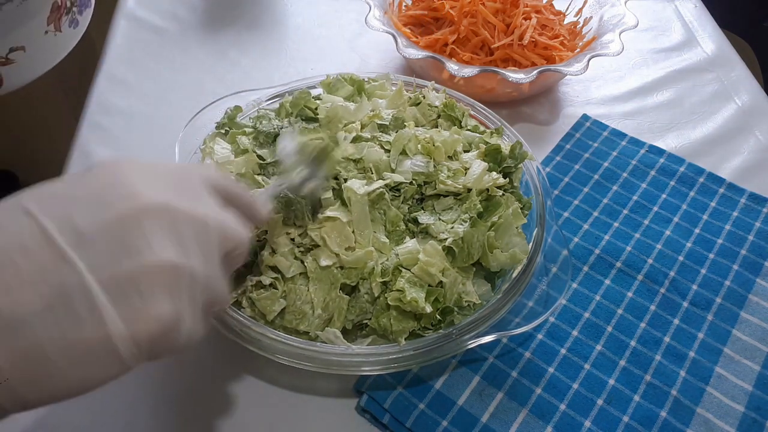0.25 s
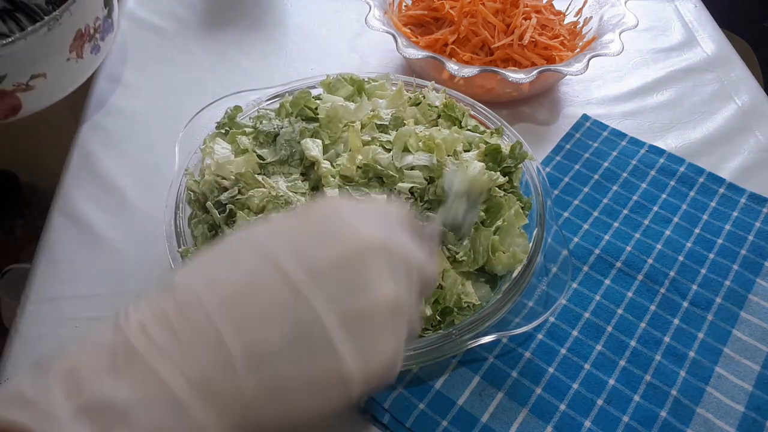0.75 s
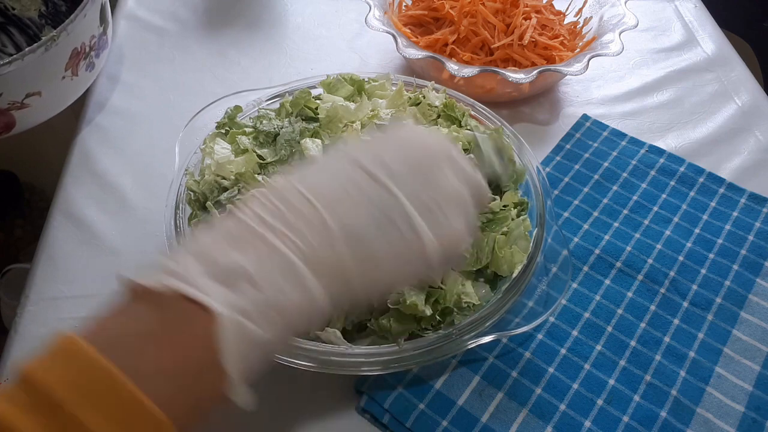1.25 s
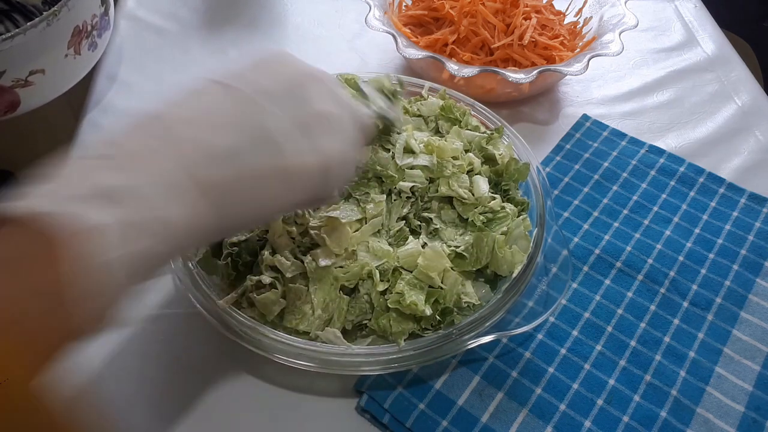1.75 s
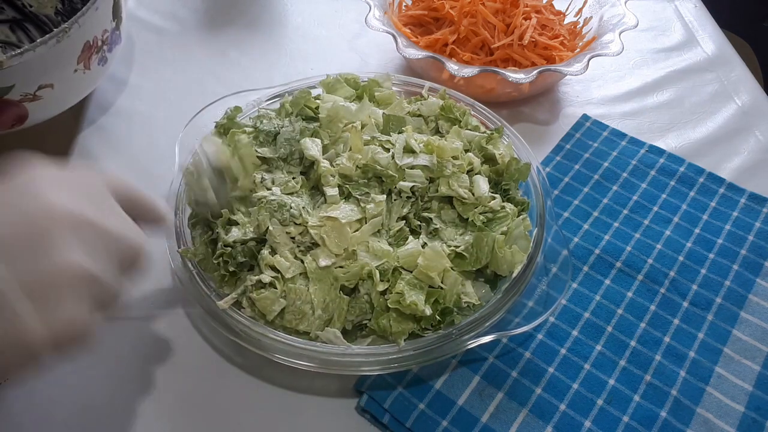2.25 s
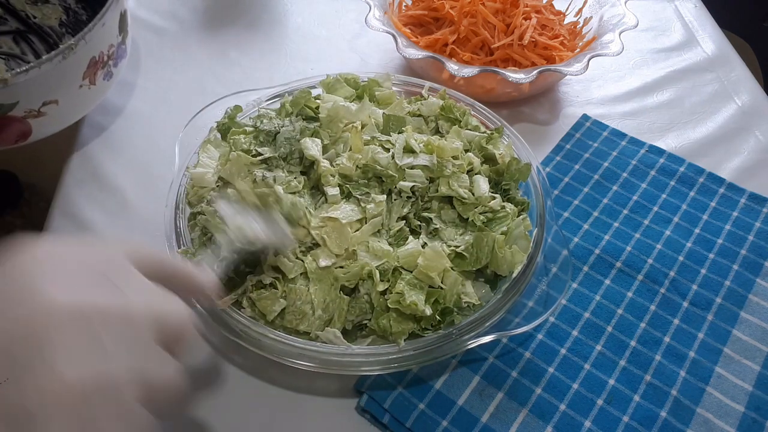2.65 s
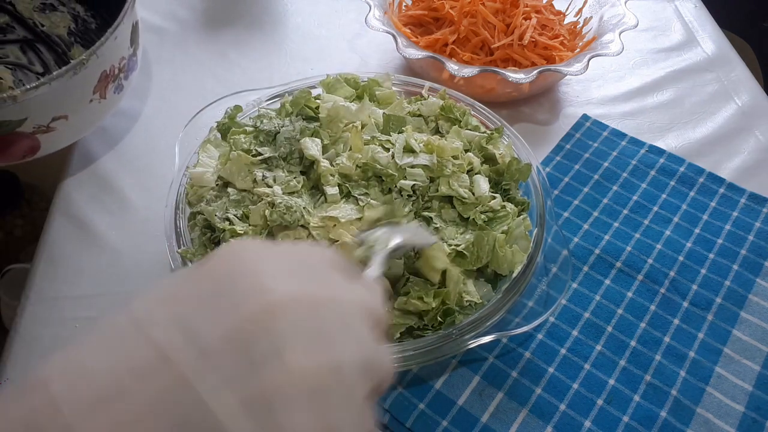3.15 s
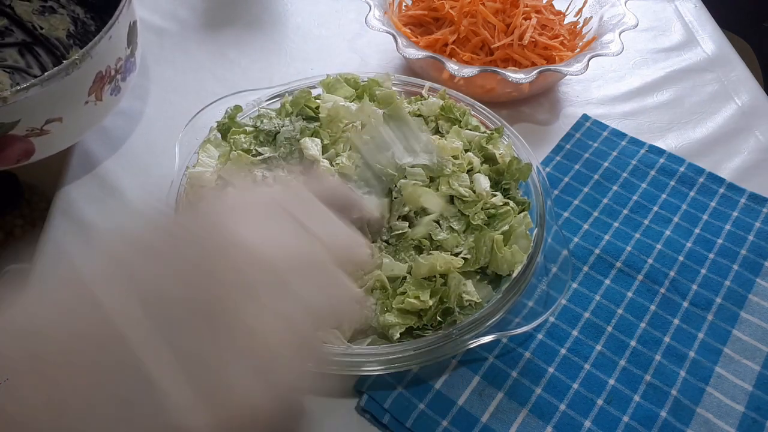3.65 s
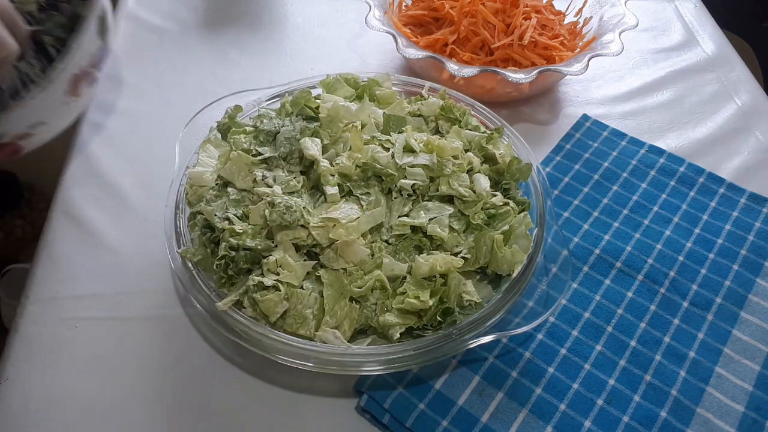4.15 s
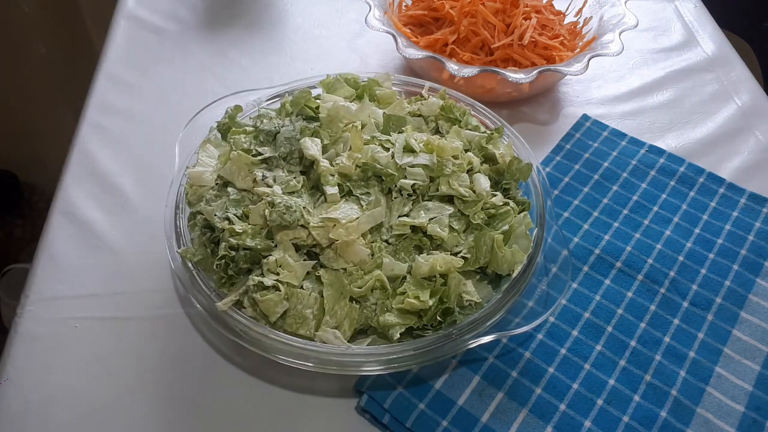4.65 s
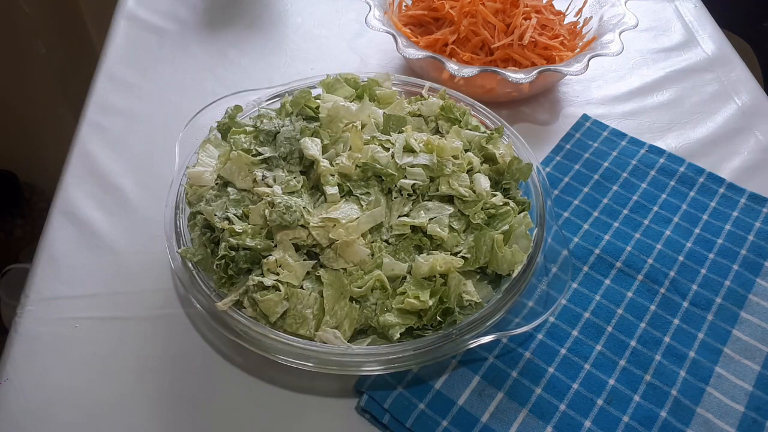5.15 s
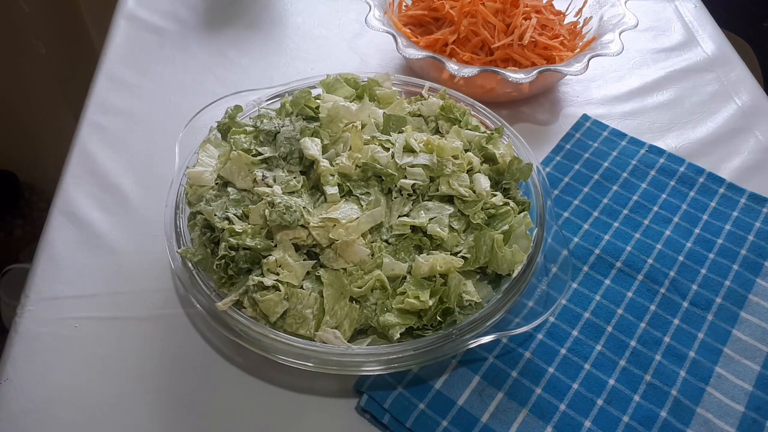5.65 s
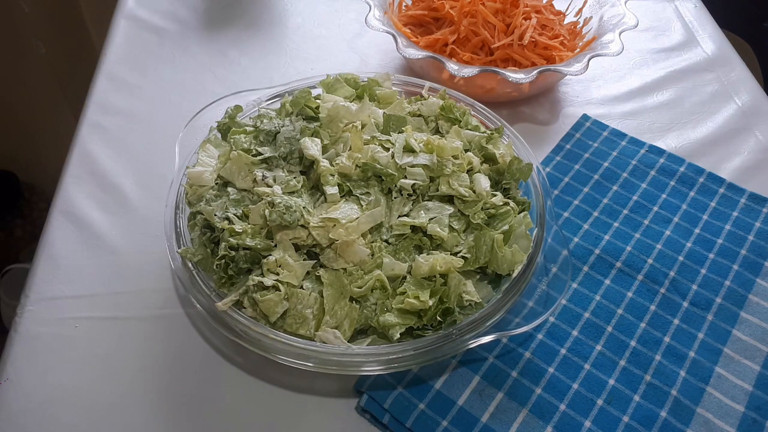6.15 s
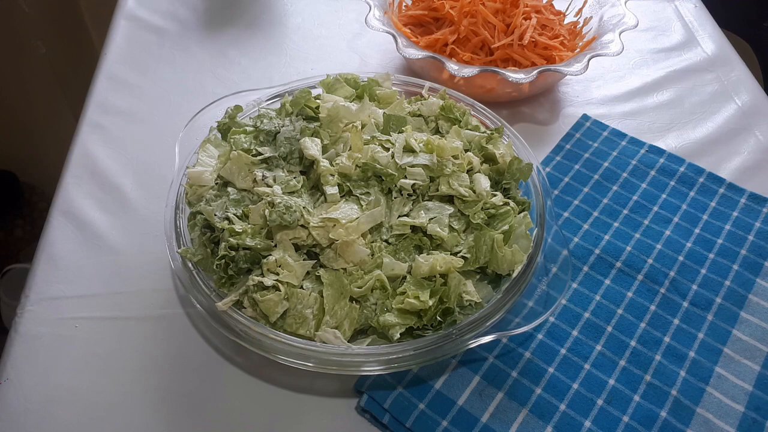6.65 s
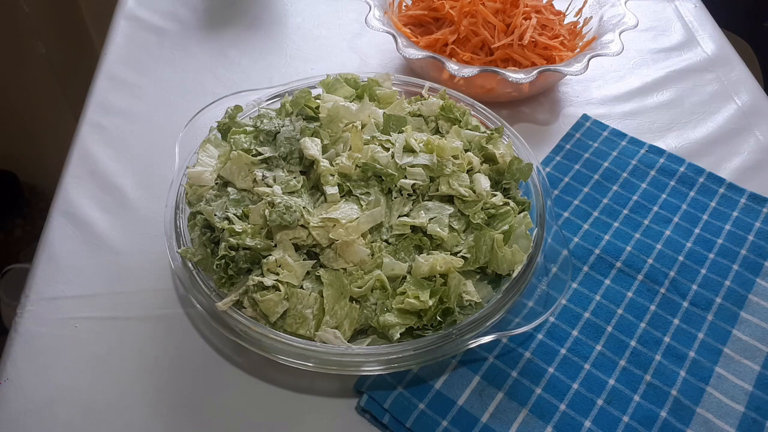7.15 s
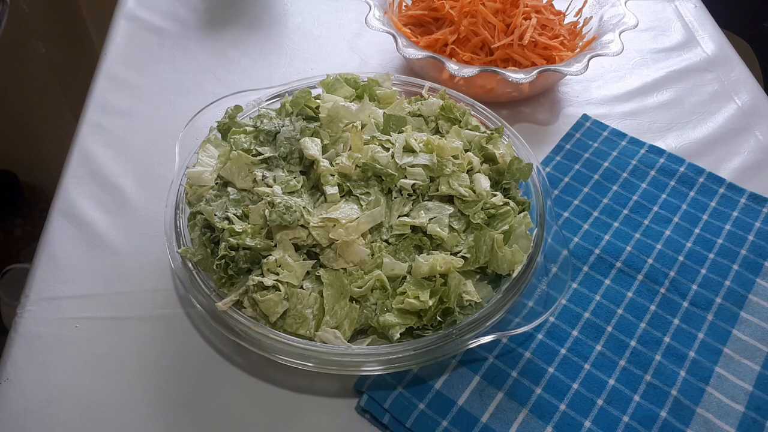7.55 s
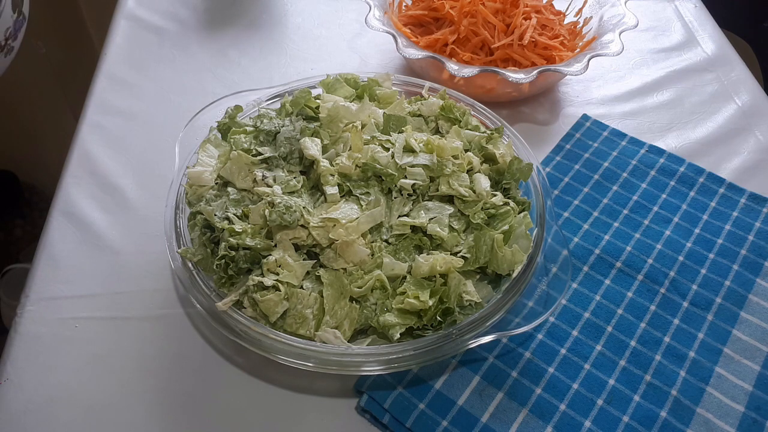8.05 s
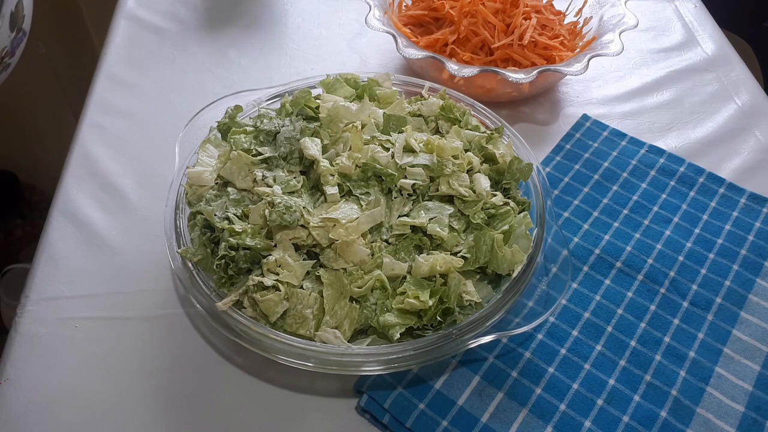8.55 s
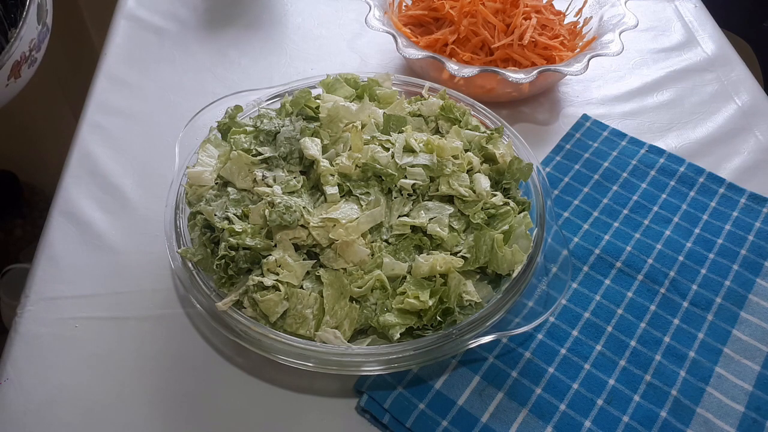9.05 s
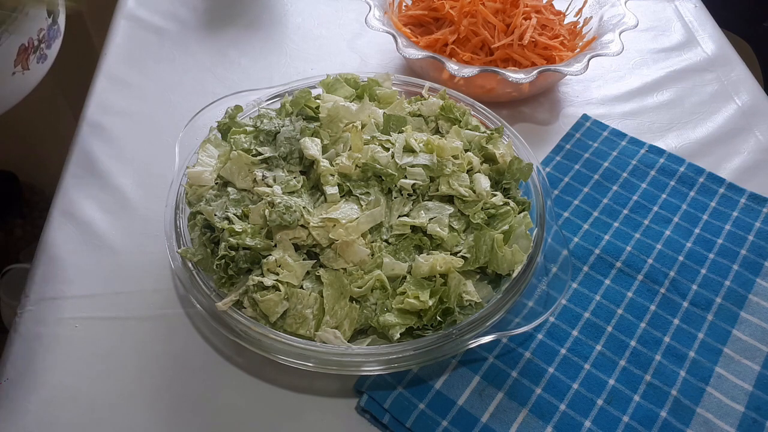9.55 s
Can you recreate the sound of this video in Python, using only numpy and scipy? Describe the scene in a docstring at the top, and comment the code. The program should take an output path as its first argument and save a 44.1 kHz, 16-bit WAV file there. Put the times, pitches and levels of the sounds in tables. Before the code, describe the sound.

Soft, irregular crunches of leaves under a spoon come first, barely above the quiet room. After a short gap, metal strikes an enamel pot: dull bottom thuds, bright clinks and rough scraping strokes, getting busier until one bright blow sets off a high ringing squeak. More scrapes and a second squeal follow, then weaker, sparse scrapes before the room falls quiet. Heard fairly close in a small, lively kitchen.

```python
"""Spoon in salad bowl and enamel pot

A spoon pats shredded salad in a glass bowl, as crackling grains, in a quiet kitchen of shaped noise and low hum.
Then it digs in an enamel pot to the left: knocks and clinks are decaying modes under bursts of contact noise.
Scrapes are gritty slips that drive the same modes; hollow rasps are narrow noise bands gliding in pitch.
In short bursts the edge sticks and slips so that the rim sings, a wavering tone. Hard kitchen walls answer."""
import sys
import numpy as np
from scipy import signal
from scipy.fft import rfft, irfft, next_fast_len
from scipy.io import wavfile
from scipy.ndimage import uniform_filter1d, map_coordinates

SR = 44100
rng = np.random.default_rng(int(sys.argv[2]) if len(sys.argv) > 2 else 0)


def wav_record(signal):
    """Record a signal, one row per channel, as 16-bit PCM in the file named by sys.argv[1]."""
    frames = np.transpose(np.atleast_2d(signal))
    bounded = np.clip(frames, -1, 1)
    # unit amplitude maps onto the largest positive 16-bit level
    quanta = np.round(bounded * 32767).astype(np.int16)
    wavfile.write(sys.argv[1], SR, quanta)


N = 431738
TIME = np.arange(N) / SR
AFTER = np.arange(SR // 2) / SR  # time since a contact [s]

# Modes of pot and spoon: (frequency [Hz], level [dB], t60 [s])
# the bottom of the pot, damped by the food
BOTTOM_MODES = [(367.4, 4.5, 0.22), (339.6, -3.5, 0.2), (390, 3.5, 0.15), (418.2, -14.5, 0.13),
                (484.7, -1, 0.04), (511.4, -4.5, 0.21), (577, -3.5, 0.2), (636, -5.5, 0.088)]
# the lower bending modes of the wall
WALL_MODES = [(893, 5, 0.092), (1050, -1.5, 0.14), (1172, 9, 0.061), (1213, 3, 0.17), (1318, 3.5, .15),
              (1287, -5.5, .18), (1514, -7.5, 0.067), (1480, -12.5, .2)]
# the close modes of the rim
RIM_MODES = [(1940, -9.5, 0.26), (1887, 10, .35), (1914, 11.5, 0.16)]
# modes of the wall and of the spoon
BRIGHT_MODES = [(2319, -8, 0.087), (2616, 1.5, 0.16), (2753, 1, 0.068), (2940, -6, 0.075),
                (3174, -4.5, 0.14), (3477, -3.5, 0.077), (3650, 3.5, 0.15), (3840, 3, .1),
                (3976, -5.5, 0.049), (4220, -4, 0.11), (4330, -13, .13), (4555, -1.5, 0.3),
                (4720, -12.5, 0.17), (5650, -13, .1), (5690, -0.5, 0.057)]
# the highest modes
SHIMMER_MODES = [(6830, -1, .09), (6370, 4.5, 0.076), (6980, -2, 0.086), (7140, 2, 0.13), (7700, 0.5, .1),
                 (8100, -7, 0.13), (9520, 0.5, 0.044), (10200, 3, .1), (10600, -38.5, 0.13),
                 (11600, -14, .1)]

# Colours of the contact noise, from dull to bright: (frequency [Hz], spectrum level [dB])
# on the bottom
PUSH_COLOUR = [(200, -49.5), (300, -18.5), (370, 4.5), (620, -5), (800, -4), (1100, -36.5)]
# on the wall and rim
RASP_COLOUR = [(250, -32), (350, -12), (480, -34), (780, -12), (1200, 4.5), (1600, -4), (1900, -3),
               (2300, -7.5), (3000, -31)]
# with the bright modes
GRIND_COLOUR = [(1400, -30.5), (2200, -0.5), (3100, 1), (3700, 4), (4300, 0), (5100, -3.5), (5800, 2.5),
                (6500, -15), (8000, -49.5)]
# with the highest modes
FIZZ_COLOUR = [(4800, -53.5), (6300, -2.5), (7200, 5.5), (8100, -4), (8800, -9), (10000, -5.5),
               (13000, -5.5), (16000, -5.5)]


def amp(db):
    """Decibels to gain."""
    return 10 ** (np.asarray(db) / 20)


def unit(x):
    """Scaled to rms 1."""
    return x / np.sqrt(np.mean(x ** 2) + 1e-20)


def along(points, hz):
    """(Hz, value) points read on a log frequency axis."""
    f, v = np.transpose(points)
    return np.interp(np.log(hz + 1), np.log(f + 1), v)


def curves(rows):
    """One value per sample for each column after the time."""
    s, *cols = np.transpose(rows)
    return [np.interp(TIME, s, c) for c in cols]


def wobble(rate):
    """A smooth random curve, rate knots a second."""
    knots = rng.standard_normal(int(N * rate / SR) + 4)
    return map_coordinates(knots, [TIME * rate])


def filtered(x, response):
    """x with its spectrum multiplied by a function of frequency."""
    n = x.shape[-1]
    m = next_fast_len(n + 8192, True)
    return irfft(rfft(x, m) * response(np.fft.rfftfreq(m, 1 / SR)), m)[..., :n]


def coloured(x, spectrum):
    """x shaped by a spectrum, at rms 1."""
    return unit(filtered(x, lambda hz: amp(along(spectrum, hz))))


def add(track, s, sound):
    """Mix a sound into the track at time s."""
    part = track[:, round(s * SR):][:, :sound.shape[1]]
    part += sound[:, :part.shape[1]]


def at_level(x, db, size=1300):
    """A hit whose first size samples have this rms level."""
    return amp(db) * x / np.sqrt(np.mean(x[:, :size] ** 2))


def grains(size, rate, spread_db):
    """Tiny random slips of very uneven strength, rate a second on average."""
    hits = rng.random(size) < rate / SR
    strength = rng.standard_normal(size) * amp(spread_db * rng.standard_normal(size))
    return unit(hits * strength)


def kitchen(x, wet_db, count=16):
    """Direct sound reaches the left port count samples early; a diffuse tail follows, alike at both in the bass."""
    # how fast the reflections die: (frequency [Hz], t60 [s])
    tail_t60 = [(200, 0.3), (600, 0.41), (1500, 0.37), (4000, 0.28), (9000, 0.24), (16000, 0.21)]
    hz, t, z = signal.stft(rng.standard_normal((2, len(AFTER))), SR, nperseg=256)
    # mixing angle: the ports share the bass and grow unlike towards the treble
    turn = np.arccos(np.sinc(hz / 1100))[:, None] / 2
    z = np.cos(turn) * z[0] + np.sin(turn) * np.array([z[1], -z[1]])
    decay = amp(-60 * t / along(tail_t60, hz)[:, None])
    tail = signal.istft(z * decay, SR, nperseg=256)[1]
    tail = tail * (1 - np.exp(-np.arange(tail.shape[1]) / SR / 0.00025))
    paths = amp(wet_db) * tail / np.linalg.norm(tail[0])
    paths[0, 0] += 1
    paths[1, count] += 1
    return signal.fftconvolve(x[None], paths / np.linalg.norm(paths[0]), axes=1)[:, :len(x)]


def room_tone():
    """A low rush with a little treble hiss, its level drifting slowly, and a faint mains hum."""
    # colour of the rush: (frequency [Hz], spectrum level [dB])
    rush_colour = [(12, -48.5), (20, -24), (38, -9), (93, -2), (204, -1.5), (319, -3), (357, -5.5),
                   (499, -6.5), (624, -11), (1190, -13.5), (1910, -29), (2320, -29), (5530, -38.5),
                   (7730, -35.5), (16000, -42.5)]
    # drift of the rush: (time [s], level [dB])
    rush_level = [(0, -56.5), (2.5, -55.5), (3.8, -54.5), (5.2, -56), (6.5, -54), (8.3, -58), (9.3, -58),
                  (9.7, -56.5)]
    # stereo width: (frequency [Hz], left-right likeness [0 to 1])
    likeness = [(60, 0.89), (150, 0.97), (380, 0.76), (950, 0.059), (2380, 0.02), (5980, 0.14),
                (15000, 0.94)]

    def mid_and_side(hz):
        turn = np.arccos(np.clip(along(likeness, hz), -1, 1)) / 2
        return amp(along(rush_colour, hz)) * [np.cos(turn), np.sin(turn)]

    mid, side = filtered(rng.standard_normal((2, N)), mid_and_side)
    level_db = curves(rush_level)[0] + 0.16 * wobble(2.56)
    rush = unit(np.array([mid + side, mid - side])) * amp(level_db)
    hum_hz = 100.5
    phase = 2 * np.pi * hum_hz * TIME + 0.43 * wobble(3.2)
    hum = amp(-69.5 + 0.96 * wobble(3.9)) * np.sin(phase)
    return rush + hum


def pats():
    """Wet leaves crackle as the spoon presses them: dense grains that swell and die, reaching both ports together."""
    # spoon pats: (time [s], level before a common 5.5 dB cut [dB], t60 [s], treble tilt [dB per octave])
    pat_list = [(.225, -55.5, 0.19, -6.5), (.284, -58, 0.071, -8.5), (.466, -51, 0.092, -5.5),
                (.735, -65, 0.08, 6), (.989, -60.5, 0.06, 5), (1.237, -49.5, 0.031, -0.5),
                (1.503, -60.5, 0.18, -0.5), (1.735, -60.5, 0.2, -6.5), (2.1, -60.5, 0.18, 0.5),
                (2.37, -51, 0.053, -3.5), (2.785, -68, .15, 3.5), (3.07, -62.5, 0.28, -4),
                (3.323, -66, 0.19, -1.5), (3.397, -61.5, 0.13, -6.5)]
    # colour of the leaves before the tilt: (frequency [Hz], spectrum level [dB])
    leaf_colour = [(500, -12), (1400, -4.5), (2200, 2.5), (3000, -7), (4300, -3), (8000, -6), (10000, -19),
                   (16000, -9)]
    out = np.zeros((2, N))
    for s, db, t60, tilt_db in pat_list:
        rise = 0.26 * t60 ** 2  # time constant [s]: a pat that dies slowly also starts slowly
        colour = [(hz, level + tilt_db * np.log2(hz)) for hz, level in leaf_colour]
        crackle = coloured(grains(len(AFTER), rate=7000, spread_db=3.0), colour)
        swell = (1 - np.exp(-AFTER / rise)) * amp(-60 * AFTER / t60)
        heard = kitchen(crackle * swell, wet_db=1, count=0)
        add(out, s, at_level(heard, db - 5.5))
    return out


def ring(modes, damping=1.0, scatter_db=2.0, detune=0.0045):
    """Modes struck at a new spot, of energy 1: scattered in level and pitch, dying faster when damped."""
    hz, db, t60 = np.transpose(modes)[:, :, None]
    level = db + scatter_db * rng.standard_normal(hz.shape) - 60 * AFTER * damping / t60
    hz = hz * (1 + detune * rng.standard_normal(hz.shape))
    sign = rng.choice([-1, 1], hz.shape)
    x = np.sum(sign * amp(level) * np.sin(2 * np.pi * hz * AFTER), axis=0)
    return x / np.linalg.norm(x)


def strike(modes, colour, crack_db, crack_t60, wet_db):
    """One part of the pot rings under a short burst of contact noise."""
    crack = coloured(rng.standard_normal(len(AFTER)), colour) * amp(-60 * AFTER / crack_t60)
    x = ring(modes) + amp(crack_db) * crack / np.linalg.norm(crack)
    return kitchen(x * (1 - np.exp(-AFTER / 0.0024)), wet_db)


def blows():
    """Deep blows thud on the bottom; high, glancing ones ring the rim. Each leaves one mode singing."""
    # spoon blows on the pot: (time [s], strength [dB], depth [0 rim to 1 bottom],
    # singing mode [Hz], its level re strength [dB])
    blow_list = [(4.263, -34, .6, 4715, -5), (4.458, -39, .15, 3667, 3.5), (4.671, -38.5, .05, 4300, -17),
                 (4.967, -45.5, .4, 4450, -18), (5.237, -48, 1, 3720, -2), (5.44, -54.5, .95, 3680, -13),
                 (5.62, -31, .95, 3735, 0), (5.959, -30.5, .95, 4590, -12), (6.329, -32, .85, 3920, -9.5),
                 (6.630, -28, .1, 3720, -2.5), (8.432, -47.5, .25, 1956, 7.5), (8.736, -59.5, .8, 5550, -3),
                 (8.92, -61, .9, 5400, -5)]
    # thud, wall, rim, clink and tick re strength [dB], struck at the rim and on the bottom
    at_rim_db = np.array([-9, -3.5, -0.5, -0.5, 2])
    on_bottom_db = np.array([7.5, 3.5, -4, -0.5, -2])
    chime_t60 = 0.19  # s
    out = np.zeros((2, N))
    for s, db, depth, chime_hz, chime_db in blow_list:
        thud_db, wall_db, rim_db, clink_db, tick_db = db + (1 - depth) * at_rim_db + depth * on_bottom_db
        thud = strike(BOTTOM_MODES, PUSH_COLOUR, crack_db=-1.5, crack_t60=0.092, wet_db=-5)
        add(out, s, at_level(thud, thud_db))
        wall = strike(WALL_MODES, RASP_COLOUR, crack_db=5.0, crack_t60=0.06, wet_db=2.0)
        add(out, s, at_level(wall, wall_db))
        rim = strike(RIM_MODES, RASP_COLOUR, crack_db=-17, crack_t60=0.03, wet_db=-8.0)
        add(out, s, at_level(rim, rim_db))
        clink = strike(BRIGHT_MODES, GRIND_COLOUR, crack_db=7.5, crack_t60=0.036, wet_db=5.5)
        add(out, s, at_level(clink, clink_db))
        tick = strike(SHIMMER_MODES, FIZZ_COLOUR, crack_db=8.5, crack_t60=0.04, wet_db=2.5)
        add(out, s, at_level(tick, tick_db))
        chime = np.sin(2 * np.pi * chime_hz * AFTER) * amp(-60 * AFTER / chime_t60)
        chime = chime * (1 - np.exp(-AFTER / 0.0019))
        add(out, s, at_level(kitchen(chime, wet_db=-3.5), db + chime_db))
    return out


def arch(length, skew=1):
    """Rises from 0 to 1 and falls back within length seconds; a skew below 1 crests early."""
    return np.abs(np.sin(np.pi * np.clip(AFTER / length, 0, 1) ** skew)) * (AFTER < length)


def stroke_forces():
    """Pressure swells and eases in each stroke; it drives the grinding, edge hiss, wall drone and rim hum."""
    # scraping strokes: (start [s], length [s], pressure [dB], edge hiss re pressure [dB],
    # wall drone re pressure at mid-stroke [dB], depth [0 rim to 1 bottom])
    stroke_list = [(4.269, 0.14, -42.5, -2.5, -3, 0.77), (4.371, 0.048, -34.5, 1, -2, 1),
                   (4.77, 0.12, -44.5, 5, -4.5, 0.96), (5.27, 0.18, -35, -4, -4, 0.6),
                   (5.618, .16, -33.5, -2, -16, 0.59), (5.967, 0.15, -35.5, -3.5, -3.5, 0.54),
                   (6.341, 0.15, -36, -6, -6.5, 0.68), (6.71, 0.22, -43, -11.5, 0.5, 0.029),
                   (6.879, 0.12, -34.5, -4, -6.5, 0.3), (6.982, 0.18, -39.5, -8.5, -4.5, 0.087),
                   (7.134, .105, -36.5, -4.5, -16, 0.12), (7.213, 0.15, -50, -6.5, 0.5, 0),
                   (7.341, 0.18, -48, -8.5, 1, 0.0083), (7.571, 0.13, -51.5, -8, -3, 0),
                   (7.729, 0.1, -47.5, -10.5, -14, 0), (7.819, 0.079, -45.5, -5.5, -11, 0.11),
                   (8.424, 0.1, -48, -10, 1, 0.26), (8.512, 0.14, -39, -8, -27, 0.58),
                   (8.727, 0.097, -50.5, -5.5, -4.5, 1), (8.949, 0.17, -51, -11.5, -6, 0.023),
                   (9.081, .048, -49.5, -1.5, -2, 0.016)]
    wall_fade_db = 3.5  # loss of the wall drone re pressure over a stroke
    rim_hum_db, rim_muffle_db = 4, 16.5  # rim hum re pressure at the rim; its loss on the bottom
    forces = np.zeros((4, N))
    for s, length, db, hiss_db, wall_db, depth in stroke_list:
        progress = np.clip(AFTER / length, 0, 1) - .5
        pressure = amp(db) * arch(length, skew=0.94) ** 0.97
        hiss = pressure * amp(hiss_db)
        drone = pressure * amp(wall_db - wall_fade_db * progress)
        rim = pressure * amp(rim_hum_db - rim_muffle_db * depth)
        add(forces, s, np.array([pressure, hiss, drone, rim]))
    return forces


def patchy(x, depth_db, size=4):
    """The contact point wanders, so that ever other bands are favoured."""
    z = signal.stft(x, nperseg=512)[2]
    field = uniform_filter1d(rng.standard_normal(z.shape), size, 0)
    field = uniform_filter1d(field, 2 * size, 1)
    return signal.istft(z * amp(depth_db * unit(field)), nperseg=512)[1][:len(x)]


def rub(force, modes, colour, ring_db, damping):
    """Gritty slips under the moving edge sound directly and keep the modes ringing, in a new mix at each spot."""
    spot_s, spot_db = 0.1, 10.5  # time per spot; how clearly the edge favours one of three mode mixes
    slips = unit(patchy(grains(N, rate=2000, spread_db=3), depth_db=3))
    knots = rng.standard_normal((3, 100))
    favour = np.array([np.interp(TIME, np.arange(0, 10, spot_s), row) for row in knots])
    nearness = amp(spot_db * favour)
    spots = nearness / np.linalg.norm(nearness, axis=0)
    bodies = np.array([ring(modes, damping, scatter_db=2.5, detune=0.002) for _ in spots])
    ringing = signal.oaconvolve(force * slips * spots, bodies, axes=1).sum(axis=0)[:N]
    return force * coloured(slips, colour) + amp(ring_db) * ringing


def scrapes():
    """The spoon's edge chatters over the enamel, stroke after stroke; its pressure damps the modes, most the rim's."""
    grind, hiss, drone, rim = stroke_forces() * amp(1.5 * wobble(70))
    x = amp(-4.5) * rub(grind, BRIGHT_MODES, GRIND_COLOUR, ring_db=1.5, damping=2.0)
    x += amp(2.5) * rub(hiss, SHIMMER_MODES, FIZZ_COLOUR, ring_db=-8.5, damping=1.3)
    x += amp(-2.5) * rub(drone, WALL_MODES, RASP_COLOUR, ring_db=-8, damping=1.67)
    x += amp(-11.5) * rub(rim, RIM_MODES, RASP_COLOUR, ring_db=13, damping=6)
    x += amp(-16) * rub(drone + grind / 2, BOTTOM_MODES, PUSH_COLOUR, ring_db=3, damping=1.1)
    return kitchen(x, wet_db=1.5)


def rasps():
    """Short hollow rasps: a narrow band of friction noise swells, glides with the contact point and fades."""
    # gliding rasps: (start [s], length [s], start pitch [Hz], end pitch [Hz], level [dB])
    rasp_list = [(5.303, 0.1, 2200, 2384, -42), (7.137, 0.079, 1403, 1430, -45),
                 (7.38, 0.053, 1168, 1255, -46.5), (7.56, 0.107, 1350, 1475, -45.5),
                 (8.535, 0.109, 1800, 1820, -50), (8.731, 0.153, 2310, 2280, -54),
                 (8.731, 0.099, 3265, 3210, -51.5), (8.736, .3, 5900, 5200, -68),
                 (8.928, 0.19, 3500, 3320, -54), (8.959, .17, 1110, 1305, -55),
                 (8.991, .15, 1845, 2067, -47), (9, 0.11, 2420, 2806, -46)]
    x = np.zeros((1, N))
    for s, length, start_hz, end_hz, db in rasp_list:
        width_hz = 0.12 * start_hz
        u = np.clip(AFTER / length, 0, 1)
        # slow noise on a gliding carrier makes a narrow noise band around it
        noise = rng.standard_normal(len(u))
        flutter = unit(filtered(noise, lambda hz: 1 / (1 + (3.2 * hz / width_hz) ** 2)))
        pitch_hz = start_hz + (end_hz - start_hz) * u
        carrier = np.sqrt(2) * np.sin(2 * np.pi * np.cumsum(pitch_hz) / SR)
        swell = np.sqrt(4 * u * (1 - u))
        add(x, s, (amp(db) * swell * flutter * carrier)[None])
    return kitchen(x[0], wet_db=1.5)


def squeals():
    """Stick and slip lock onto the rim in short bursts: a wavering tone with a weak overtone, which rings on."""
    # singing bursts: (crest [s], length [s], pitch [Hz], level [dB])
    squeal_list = [(6.637, 0.015, 1978, -20), (6.657, 0.033, 1927, -13), (6.686, 0.013, 1948, -16.5),
                   (6.707, .026, 1914, -29), (7.208, 0.041, 1940, -32.5), (7.67, 0.1, 1936, -47),
                   (7.779, 0.067, 2030, -28), (7.799, 0.022, 1992, -24), (7.852, 0.073, 1989, -21),
                   (7.877, 0.03, 1955, -24.5), (7.904, 0.022, 1963, -24)]
    ring_on_db, ring_on_t60 = -19, 0.42  # the rim rings on after each burst: level re burst [dB], decay [s]
    power = np.zeros((1, N))
    for s, length, _, db in squeal_list:
        ring_on = amp(ring_on_db - 60 * AFTER / ring_on_t60) * np.clip(AFTER / length, 0, 1)
        burst = amp(db) * np.maximum(arch(length), ring_on)
        add(power, s - length / 2, burst[None] ** 2)
    level = np.sqrt(power[0])
    hz, = curves([(s, hz) for s, _, hz, _ in squeal_list])
    phase = 2 * np.pi * np.cumsum(hz * (1 + 0.0022 * wobble(120))) / SR
    overtone = amp(-34.5) * np.sqrt(level) * np.sin(2 * phase)
    x = level * (np.sin(phase) + overtone)
    return kitchen(np.sqrt(2) * x * amp(1.5 * wobble(70)), wet_db=-10, count=17)


def scene():
    """Pot, salad and room together; the pot reaches the two ports with different colours."""
    # the pot's stereo balance: (frequency [Hz], left minus right [dB])
    balance = [(60, 1.5), (110, -8.5), (200, -0.5), (380, 3.5), (700, 0), (1290, 2), (2380, 0.5),
               (4400, -3), (8120, -3), (15000, 0)]
    pot_low_hz = 190  # the pot is too small to radiate below this
    pot = blows() + scrapes() + squeals() + rasps()
    pot = filtered(pot, lambda hz: hz ** 4 / (hz ** 4 + pot_low_hz ** 4))
    pot = filtered(pot, lambda hz: amp(np.outer([.5, -.5], along(balance, hz))))
    return pot + pats() + room_tone()


def record(dry):
    """The stereo image narrows in the top treble; a steep cut removes what lies above the band limit."""
    top_hz = 16000
    side_gain = [(5500, 0), (8000, -6), (16000, -7)]  # (frequency [Hz], gain [dB])
    mid = (dry[0] + dry[1]) / 2
    side = filtered((dry[0] - dry[1]) / 2, lambda hz: amp(along(side_gain, hz)))
    stereo = amp(0.5) * np.array([mid + side, mid - side])
    return filtered(stereo, lambda hz: 1 / (1 + (hz / top_hz) ** 160))


dry = scene()
out = record(dry)
wav_record(out)
```